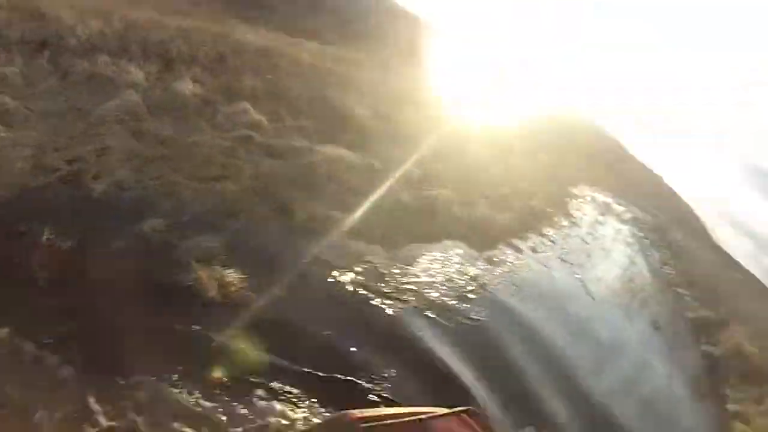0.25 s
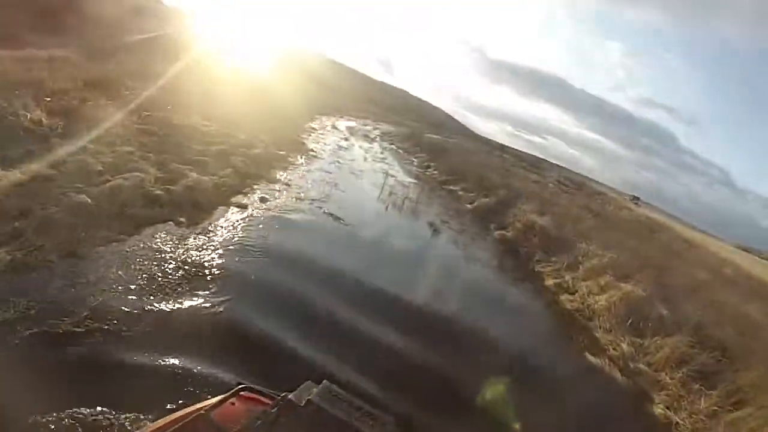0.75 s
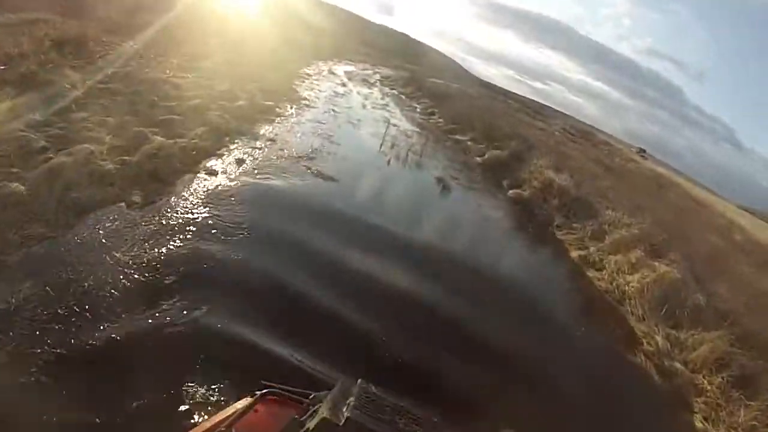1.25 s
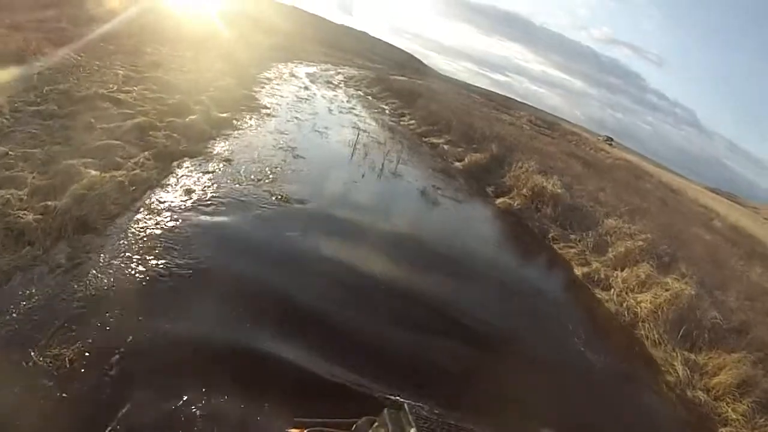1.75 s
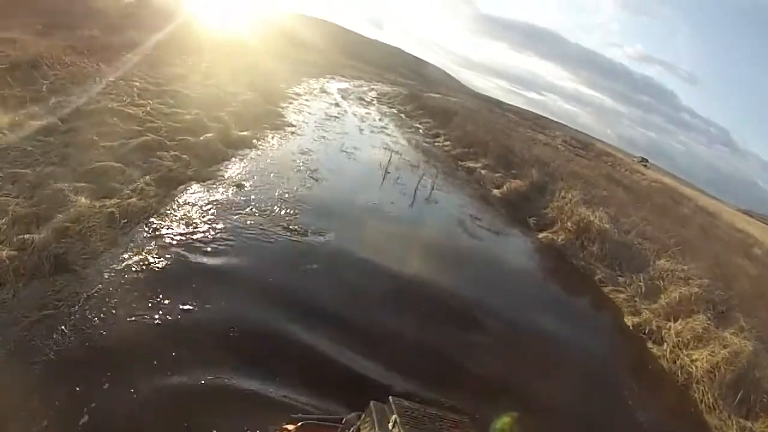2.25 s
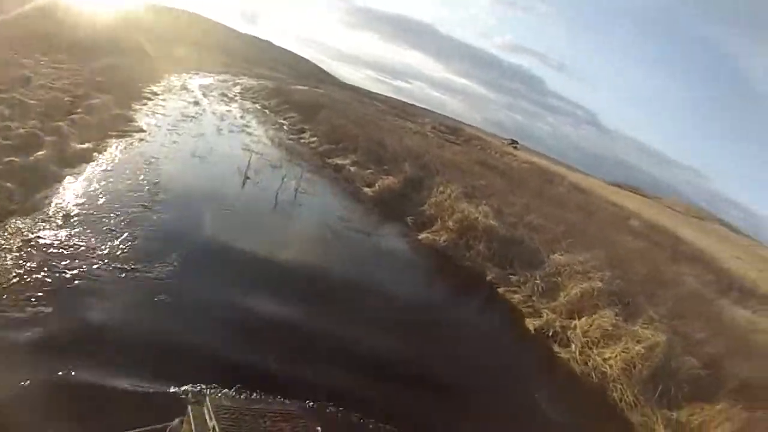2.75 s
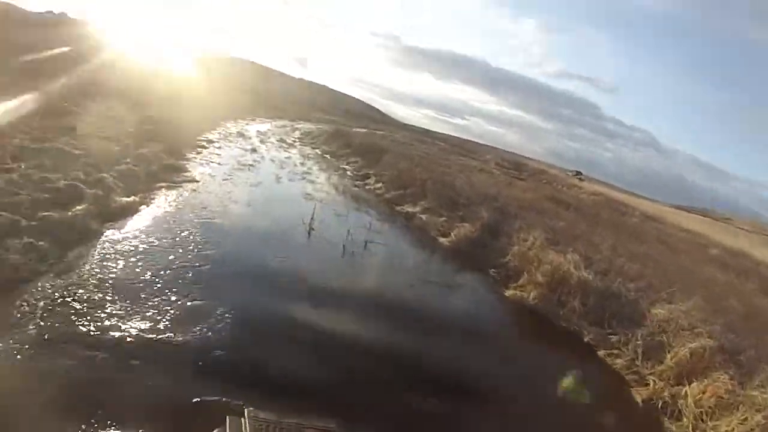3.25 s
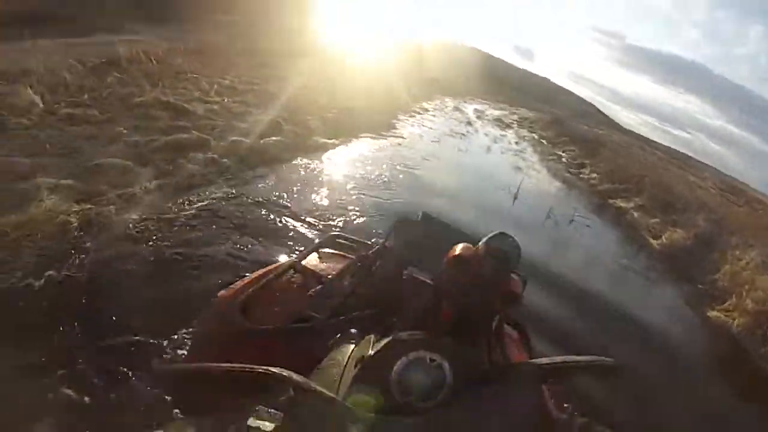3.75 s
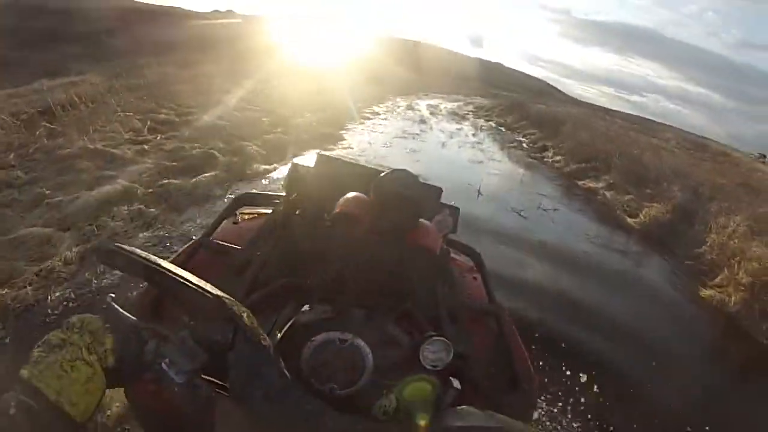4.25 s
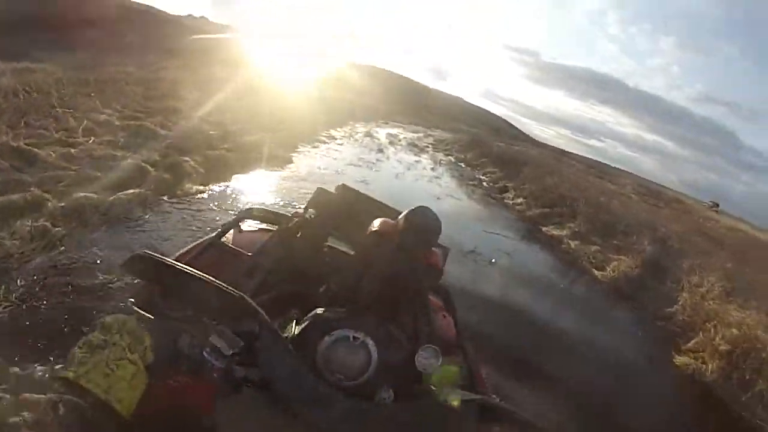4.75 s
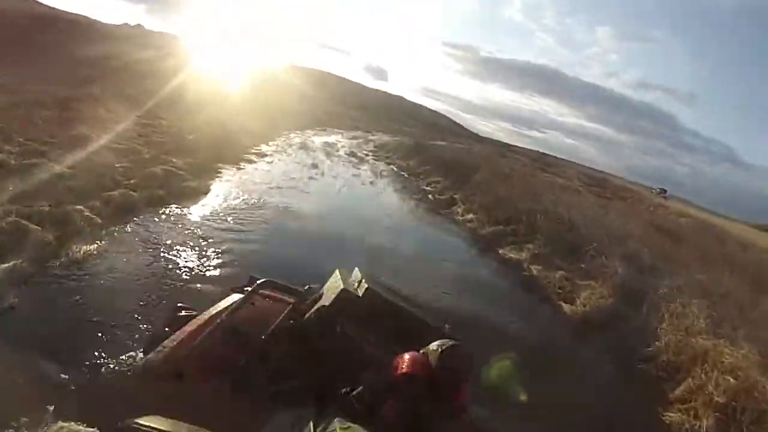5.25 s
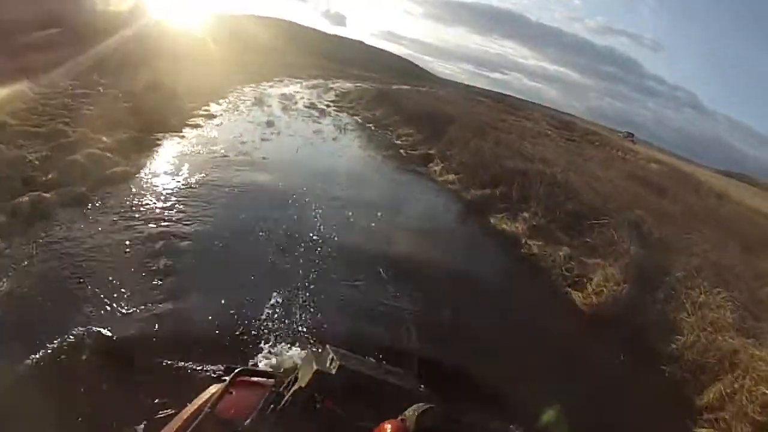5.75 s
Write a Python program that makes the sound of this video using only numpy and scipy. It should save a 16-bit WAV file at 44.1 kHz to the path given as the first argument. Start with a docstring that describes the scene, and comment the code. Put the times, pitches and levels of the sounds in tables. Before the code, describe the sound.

A twin-cylinder quad engine raps hard with metallic rattles, cruises steadily through shallow water, blips twice, then drops to a lumpy puffing idle.

```python
"""Hard firings that rattle a sealed housing and a blipped twin-cylinder engine come first, then a cruise
through shallow water, two revs and a drop to idle. The exhaust booms as a sum of orders with churning gas
beneath, and breaks into single puffs near idle. Noise and pulses timed by the engine cycle drive resonances
for intake bark, housing ring, clatter and fizz; noise bursts sound the hard firings; low noise rumbles."""
import sys
import numpy as np
from scipy import signal
from scipy.fft import rfft, irfft, next_fast_len
from scipy.io import wavfile
from scipy.ndimage import uniform_filter1d, map_coordinates

SR = 44100
rng = np.random.default_rng(int(sys.argv[2]) if len(sys.argv) > 2 else 0)


def wav_out(sig):
    """Save sig, one row per channel (or a flat mono array), as 16-bit PCM at SR to the path in sys.argv[1]."""
    wavfile.write(sys.argv[1], SR, np.round(np.clip(np.atleast_2d(sig).T, -1, 1) * 32767).astype(np.int16))


N = 264159

# Engine speed. Each row: time in seconds, engine cycles in Hz.
CYCLE_SPEED = [(0, 36), (.07, 34), (.13, 42), (.19, 46), (.31, 32), (.37, 29), (.47, 36), (.54, 30),
               (.63, 24.5), (.76, 34), (1.1, 35), (1.42, 30.9), (1.7, 33.7), (2.38, 33), (2.87, 34.4),
               (3.12, 33.7), (3.37, 28.1), (3.54, 27.7), (3.72, 40.3), (3.89, 54.3), (3.95, 52),
               (4.12, 32.5), (4.27, 25.7), (4.44, 31.7), (4.62, 47.3), (4.79, 54.3), (4.99, 50.5),
               (5.18, 25), (5.36, 16.1), (5.54, 13.9), (5.99, 13.9)]
# Throttle. Each row: time in seconds, opening (0 shut, 0.5 cruising, 1 wide open).
THROTTLE = [(0, 0.64), (.1, 0.87), (.19, 0.91), (.22, 0), (.3, 0.083), (.33, .6), (.37, 0.071), (.4, 0.85),
            (.47, 0.45), (.52, 0.19), (.63, 0.15), (.68, 0.57), (.8, 0.4), (3.52, .5), (3.62, 0.7),
            (3.8, 0.93), (3.92, 0.78), (3.96, 0.1), (4.15, 0.18), (4.38, 0.35), (4.6, 1), (4.99, 0.77),
            (5.02, 0.036), (5.99, 0)]
# Unevenness of the firings. Each row: time in seconds, unevenness (0-1).
UNEVENNESS = [(0, .12), (.2, .1), (.3, .06), (.5, .15), (.65, .25), (.8, .06), (3.4, .06), (3.9, .04),
              (4.05, .07), (4.15, .14), (4.4, .08), (4.6, .03), (5, .04), (5.14, .08), (5.24, .28),
              (5.4, .5), (5.99, .5)]
REAR_LAG = 0.383  # the rear cylinder fires this share of a cycle after the front

# Exhaust level that scales both note and churn. Each row: time in seconds, level in dB.
EXHAUST_LEVEL = [(0.0, -20), (0.33, -14.5), (0.37, -18), (0.4, -15), (0.62, -21.5), (0.72, -16.5),
                 (1.77, -17.5), (3.14, -15.5), (3.39, -18), (3.62, -14.5), (3.92, -19), (3.95, -15.5),
                 (4.15, -26.5), (4.19, -18), (4.35, -25), (4.37, -21), (4.54, -18), (4.97, -17),
                 (5.09, -15), (5.44, -34), (5.55, -29.5), (5.79, -24.5), (5.81, -28), (5.99, -25)]
# Orders of the exhaust note. Each row: order, relative level in dB at shut, cruising and open throttle.
NOTE_ORDERS = [(1, -5, -19.5, 12.5), (2, -3.5, -12.5, -9.5), (3, 0, -17, -2.5), (4, -5.5, -27, -8),
               (5, -14, -6.5, -11.5), (6, -23, -20.5, -22.5), (7, -24.5, -24, -22), (8, -34, -12, -14),
               (9, -27, -23.5, -14), (10, -32, -30, -20.5), (11, -34, -24, -11), (12, -30, -32, -16.5),
               (13, -33, -31.5, -24), (14, -37, -27.5, -21), (15, -42.5, -30, -24)]
# What the muffler and the water let through. Each row: frequency in Hz, relative level in dB.
MUFFLER_PASS = [(40, -17), (75, -2.5), (105, 9.0), (135, 6), (165, 8.0), (200, 8.5), (250, -0.5), (330, -9),
                (400, -3.5), (800, 6.5)]
# Exhaust pipe resonances. Each row: centre in Hz, width in Hz, relative level in dB.
PIPE_MODES = [(73, 41, 3), (103.7, 36, 5), (175, 39.4, 2.5), (242, 83, -7.5)]
# Single puffs near idle. Each row: start in seconds, level in dB before the puff's rise and decay.
IDLE_PUFFS = [(5.235, -9), (5.319, -11), (5.475, -14), (5.532, -10), (5.564, -12.5), (5.607, -10.5),
              (5.662, -11.5), (5.683, -11), (5.734, -16), (5.771, -14.5), (5.851, -14), (5.892, -11.5),
              (5.939, -17), (5.959, -10), (5.979, -20)]
PUFF_HZ, PUFF_T60_S, PUFF_RISE_S = 124, 0.075, 0.0031  # each puff's pitch scatters about PUFF_HZ

# Driving levels, before the offsets below. Each row: time in seconds, intake roar in dB,
# housing ring in dB, clatter in dB, treble in dB.
LAYER_LEVELS = [(0.0, -43.5, -38, -40, -47), (0.03, -28, -29.5, -36, -48), (0.05, -32.5, -29, -36.5, -46),
                (0.12, -22.5, -25, -27, -36), (0.15, -22.5, -32, -29.5, -39),
                (0.18, -22.5, -26, -28.5, -37.5), (0.2, -34.5, -26, -32, -41.5),
                (0.23, -35, -33, -33.5, -49), (0.3, -45, -38.5, -40, -50), (0.33, -26.5, -36, -37, -49),
                (0.37, -45, -40.5, -35, -48), (0.4, -27, -26, -32.5, -43.5), (0.46, -36, -23.5, -36.5, -47),
                (0.52, -43, -34, -40, -53.5), (0.62, -41.5, -43.5, -42.5, -54),
                (0.73, -30.5, -30, -34, -48), (0.82, -36.5, -34, -40, -52.5),
                (1.1, -39.5, -32.5, -38.5, -53.5), (1.45, -38, -38.5, -41, -56),
                (1.97, -37.5, -35, -40, -54), (3.34, -41, -40.5, -40.5, -58), (3.52, -36, -39.5, -43, -53),
                (3.6, -28.5, -28.5, -34.5, -40), (3.62, -30, -29, -34, -44.5),
                (3.75, -27, -24.5, -34.5, -38), (3.8, -18.5, -18.5, -26, -31.5),
                (3.9, -30, -19.5, -23, -30), (3.95, -30.5, -25.5, -23, -39), (4.1, -44, -31.5, -36, -48.5),
                (4.3, -37, -33.5, -37.5, -49), (4.62, -19.5, -22.5, -28.5, -31.5),
                (4.67, -20.5, -19, -21, -28.5), (4.75, -20.5, -21.5, -22, -26),
                (4.94, -33, -21.5, -23, -31.5), (4.97, -27, -23.5, -25.5, -34),
                (5.04, -39, -26, -33.5, -45.5), (5.3, -49.5, -43.5, -44.5, -52.5),
                (5.6, -48.5, -41, -43.5, -49.5), (5.81, -50, -47.5, -48.5, -59.5),
                (5.99, -56, -48, -49.5, -61)]
# offsets added to the driving levels
GROWL_DB, BARK_DB, SNAP_DB, RING_DB, CLATTER_DB, FIZZ_DB = -4, -6, -4, 0.5, 0, -1

# Resonances. Each row of the next six tables: centre in Hz, width in Hz, relative level in dB.
# Airbox.
AIRBOX_MODES = [(318, 77, -2.5), (398, 110, 1.5), (497, 178, -3.5)]
# Intake duct.
INTAKE_MODES = [(642, 290, 1), (827, 91, 4.5), (909, 81, 2.5)]
# Housing, two lower modes and then two upper ones.
HOUSING_MODES = [(1215, 170, -6), (1340, 127, -2), (1563, 124, -0.5), (1598, 45, -2.5)]
# Loose panels.
PANEL_MODES = [(1859, 48, 0.5), (2036, 98, -0.5), (2267, 88, -6), (2496, 114, -6), (3046, 208, -13.5)]
# Fizz of the water, and small loose parts under hard firings.
FIZZ_MODES = [(3500, 880, -0.5), (5020, 430, -5.5), (5400, 150, -4.5), (6880, 540, -8), (7870, 670, -15),
              (12200, 510, -35.5)]
# Treble rasp at open throttle.
RASP_MODES = [(3280, 340, -1.5), (4200, 600, -2.5), (4920, 110, -6), (5240, 300, -17), (7330, 210, -12.5),
              (8700, 2300, -33)]

# Hard firings that rattle the housing. Each row: start in seconds, starting level in dB
# before the resonances.
HARD_FIRINGS = [(0.083, -10), (0.105, -3.5), (.1291, -12), (0.1506, -4), (0.175, -4), (0.197, -10),
                (.331, -14.5), (.389, -16), (0.4193, -7.5), (0.455, -11), (.486, -14.5), (.653, -21.5),
                (0.7325, -19), (0.795, -22), (0.822, -16.5), (.969, -17.5), (1.056, -17.5), (1.111, -17),
                (3.564, -22), (3.599, -17), (3.71, -7.5), (5.425, -25), (5.826, -27.5)]
BODY_DB, PARTS_DB = -1, -32  # how much a hard firing rings the body and the loose parts
# Low rumble. Each row: time in seconds, level in dB.
RUMBLE_LEVEL = [(0.0, -42), (0.06, -36.5), (1.43, -34.5), (2.65, -42), (3.65, -29.5), (3.69, -33),
                (4.04, -38), (4.45, -33), (4.61, -31), (4.72, -39), (5.41, -27), (5.89, -40), (5.99, -38)]


def engine():
    """Synchronous excitation: one cycle phase times the exhaust, intake, clatter and spray."""
    cycle_hz, = curves(CYCLE_SPEED)
    roar_db, housing_db, panels_db, treble_db = curves(LAYER_LEVELS)
    opening = np.clip(curves(THROTTLE)[0], 0, 1)
    open_share = np.clip(2 * opening - .85, 0, 1)
    turns = np.cumsum(cycle_hz) / SR + .9
    strokes = firings(turns - .03, rear_db=0.5)
    shake = shaking(turns, strokes, open_share)
    return (exhaust(turns, cycle_hz, opening) + puffs()
            + snap(turns, open_share, roar_db)
            + bark(turns, strokes, open_share, roar_db)
            + housing_ring(shake, housing_db)
            + amp(panels_db + CLATTER_DB) * unit(resonant(shake, PANEL_MODES, (1650, 4000)))
            + fizz(turns, open_share, treble_db))


def exhaust(turns, cycle_hz, opening):
    """Tone plus turbulence: uneven running adds the noise of gas churning under water to the note."""
    exhaust_db, = curves(EXHAUST_LEVEL)
    churn = resonant(gated(turns, lag=0.038, sharp=12, depth=1.3), PIPE_MODES, (40, 300))
    churn_db = np.interp(curves(UNEVENNESS)[0], [.04, .15, .5], [-20, -7, -5])
    return amp(exhaust_db) * (note(turns, cycle_hz, opening) + amp(churn_db) * unit(churn))


def note(turns, cycle_hz, opening):
    """Fourier synthesis: orders weighted by throttle and muffler, phased by the two firings' sum."""
    clear = np.clip((cycle_hz - 19) / 6, 0, 1)  # the orders fade out near idle
    hz, pass_db = np.transpose(MUFFLER_PASS)
    out = np.zeros(N)
    for k, (_, *by_throttle_db) in enumerate(NOTE_ORDERS, 1):
        db = np.interp(opening, [0, .5, 1], by_throttle_db)
        db += np.interp(np.log(k * cycle_hz), np.log(hz), pass_db)
        firing_phase = np.angle(1 + np.exp(-2j * np.pi * k * REAR_LAG))
        out += amp(db) * np.sin(2 * np.pi * k * turns + firing_phase)
    return clear * unit(out)


def puffs():
    """Damped free oscillation: each push of gas rings the pipe for a few swings."""
    out, t = np.zeros(N + SR), np.arange(SR // 12) / SR
    for (s, db), detune in zip(IDLE_PUFFS, rng.normal(1, 0.14, len(IDLE_PUFFS))):
        decay = amp(db - 60 * t / PUFF_T60_S)
        rise = 1 - np.exp(-t / PUFF_RISE_S)
        out[round(s * SR):][:len(t)] += decay * rise * np.sin(2 * np.pi * PUFF_HZ * detune * t)
    return out[:N]


def snap(turns, open_share, roar_db):
    """Impulse response: at open throttle the valve's snap excites one broad resonance."""
    pulses = -firings(turns - .03, rear_db=-8)
    snaps = resonant(pulses, [(600, 440, 0)], (120, 2800))
    return amp(roar_db + SNAP_DB) * open_share * unit(snaps)


def bark(turns, strokes, open_share, roar_db):
    """Modulated flow noise: a wider throttle strengthens the pulses into airbox and intake duct."""
    # uneven running blurs the intake strokes
    steady = np.interp(curves(UNEVENNESS)[0], [.05, .4], [2.2, .4])
    flow = unit(gated(turns, lag=.9, sharp=4, depth=.8))
    suck = flow - (steady + 1.2 * open_share) * shaken(strokes, t60=.003)
    growl = unit(resonant(suck, AIRBOX_MODES, (290, 600)))
    duct = unit(resonant(suck, INTAKE_MODES, (560, 1100)))
    return amp(roar_db + GROWL_DB) * growl + amp(roar_db + BARK_DB) * duct


def shaking(turns, strokes, open_share):
    """Forced vibration: loose, fluctuating noise plus firing impacts that grow with the throttle."""
    loose = unit(gated(turns, lag=1.0, sharp=3, depth=0.68) * amp(1.1 * wobble(40)))
    return loose + (.55 + 2 * open_share) * shaken(strokes, t60=.03)


def housing_ring(shake, housing_db):
    """Modal response: the ring wanders between the housing's lower and upper modes."""
    drift_db = 1.7 * wobble(7)
    low = resonant(shake, HOUSING_MODES[:2], (1000, 1800))
    high = resonant(shake, HOUSING_MODES[2:], (1000, 1800))
    return amp(housing_db + RING_DB) * unit(amp(drift_db) * low + amp(-drift_db) * high)


def fizz(turns, open_share, treble_db):
    """Resonantly filtered noise: spray flares once a cycle, joined by rasp at open throttle."""
    drops = gated(turns, lag=1.0, sharp=4.6, depth=0.2) * amp(.8 * wobble(65))
    spray = unit(resonant(drops, FIZZ_MODES, (2600, 14000)))
    blows = shaken(firings(turns - .03, rear_db=-6.0), t60=0.038)
    rasp = unit(resonant(blows, RASP_MODES, (2600, 8500)))
    return amp(treble_db + FIZZ_DB) * unit(spray + 2.8 * open_share * rasp)


def hard_firings():
    """Transient excitation: each hard firing is a short noise burst ringing housing, body and parts."""
    t = np.arange(SR // 30) / SR
    padded = np.zeros(N + len(t))
    for s, db in HARD_FIRINGS:
        padded[round(s * SR):][:len(t)] += amp(db - 60 * t / 0.017) * rng.standard_normal(len(t))
    bursts = padded[:N]
    shell_modes = [(1274, 120, -5.5), (1490, 62, 5), (1980, 180, -21)]  # (Hz, width Hz, relative dB)
    shell = amp(18.0) * resonant(bursts, shell_modes, (900, 3000))
    body = amp(BODY_DB) * resonant(bursts, AIRBOX_MODES + INTAKE_MODES, (280, 1200))
    parts = amp(PARTS_DB) * resonant(bursts, FIZZ_MODES, (2600, 9000))
    return shell + body + parts


def rumble():
    """Low-frequency random vibration: bumps and wind shake the housing below the engine's note."""
    level_db, = curves(RUMBLE_LEVEL)
    lumps = rng.standard_normal(N) * amp(3 * wobble(5))
    sway = resonant(lumps, [(15, 160, -1.0), (30.8, 15, -2.0)], (4, 45))
    return amp(level_db) * unit(sway, smooth_s=0.96)


def firings(turns, rear_db):
    """Pulse train with jitter: one pulse per firing, its moment and size scattered by unevenness."""
    rough, = curves(UNEVENNESS)
    pulses = np.zeros(N)
    chance = rng.standard_normal((2, 400, 2))
    for cylinder in (0, 1):
        at = np.flatnonzero(np.diff(np.floor(turns - cylinder * REAR_LAG)))
        shift, size = chance[cylinder, :len(at)].T * rough[at]
        moved = np.clip(at + (shift * .0025 * SR).astype(int), 0, N - 1)
        pulses[moved] += amp(17.0 * size + cylinder * rear_db)
    return pulses


def shaken(pulses, t60):
    """Convolution: every firing shakes the frame with the same dying train of small impacts."""
    t = np.arange(SR // 20) / SR
    impacts = amp(-60 * t / t60) * rng.standard_normal(len(t))
    return unit(signal.fftconvolve(pulses, impacts)[:N])


def gated(turns, lag, sharp, depth):
    """Amplitude modulation: noise flares once a cycle and fades until the next."""
    flare = np.exp(-sharp * ((turns - lag) % 1))
    return rng.standard_normal(N) * (1 + depth * flare)


def resonant(x, modes, steep_hz=None):
    """Modal superposition of (Hz, width, dB) resonances; the steep_hz band cuts the sides."""
    def ring(f):
        total = 0
        for k, (centre, width, db) in enumerate(modes):
            damping = 1j * f * width
            # alternating signs
            total = total + (-1) ** k * amp(db) * damping / (centre * centre - f * f + damping)
        return total
    y = filtered(x, ring)
    if steep_hz is None:
        return y
    return signal.sosfilt(signal.butter(3, steep_hz, "band", fs=SR, output="sos"), y)


def filtered(x, response):
    """Linear filtering: the spectrum of x times a complex response of frequency."""
    m = next_fast_len(N + SR // 2)
    return irfft(rfft(x, m) * response(np.fft.rfftfreq(m, 1 / SR)), m)[:N]


def wobble(rate):
    """Band-limited chance: a smooth random curve with rate knots a second."""
    knots = rng.standard_normal(int(N * rate / SR) + 4)
    return map_coordinates(knots, [np.arange(N) * rate / SR])


def unit(x, smooth_s=.1):
    """Normalisation by power: x at a running rms of 1."""
    size = int(smooth_s * SR)
    power = uniform_filter1d(uniform_filter1d(x ** 2, size), size)
    return x / np.sqrt(np.abs(power) + 1e-20)


def curves(rows):
    """Linear interpolation: one value per sample for each column after the time."""
    s, *cols = np.transpose(rows)
    return [np.interp(np.arange(N) / SR, s, c) for c in cols]


def amp(db):
    """Decibel law: 20 dB is a factor of ten in amplitude."""
    return 10 ** (np.asarray(db) / 20)


def scene():
    """Superposition of the engine, its hard firings in the housing and the rumble."""
    return (engine() + hard_firings() + rumble())[None]


def record(dry):
    """Saturation and band limiting: loud blows are rounded off and the microphone's treble sinks away."""
    rounded = dry[0] / (1 + np.abs(dry[0] / .93) ** 6) ** (1 / 6)

    def treble_loss(hz):
        slope = amp(-12 * np.clip((hz - 11500) / 3000, 0, 2))
        return slope * (hz < 15000)  # nothing is kept from 15 kHz up
    return filtered(rounded, treble_loss)[None]


dry = scene()
out = record(dry)
wav_out(out)
```